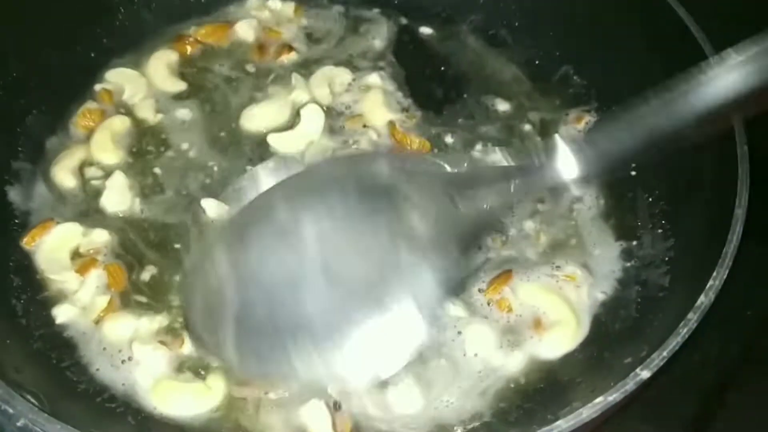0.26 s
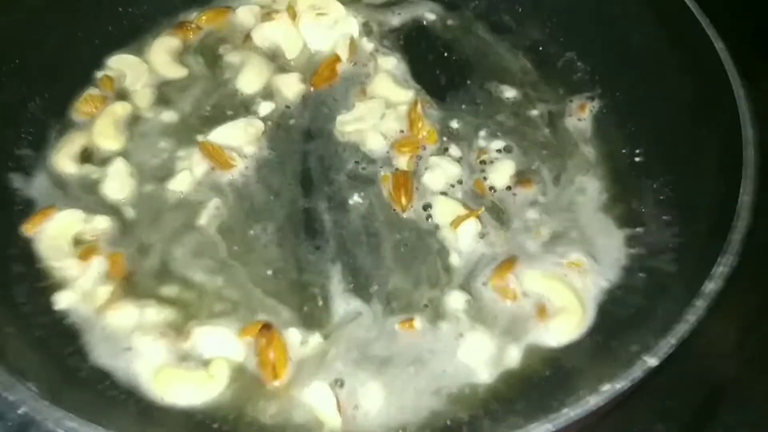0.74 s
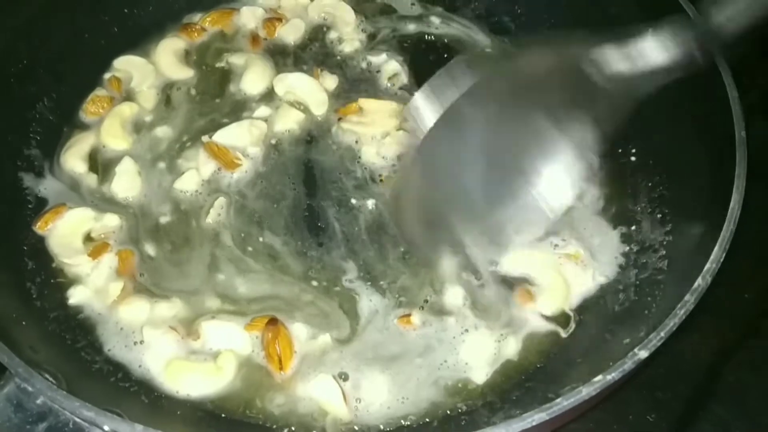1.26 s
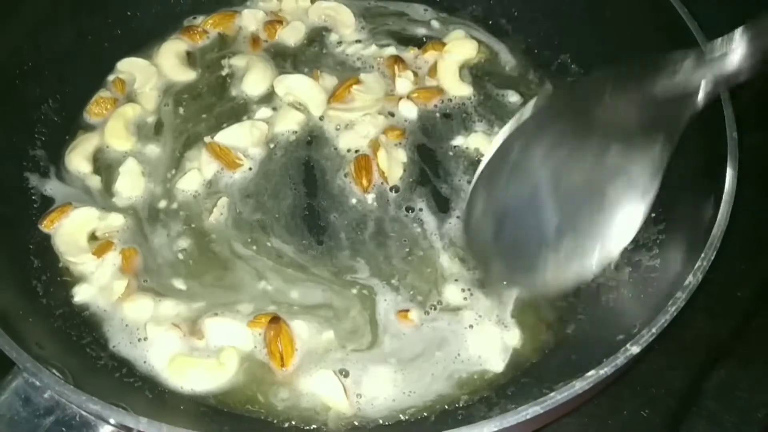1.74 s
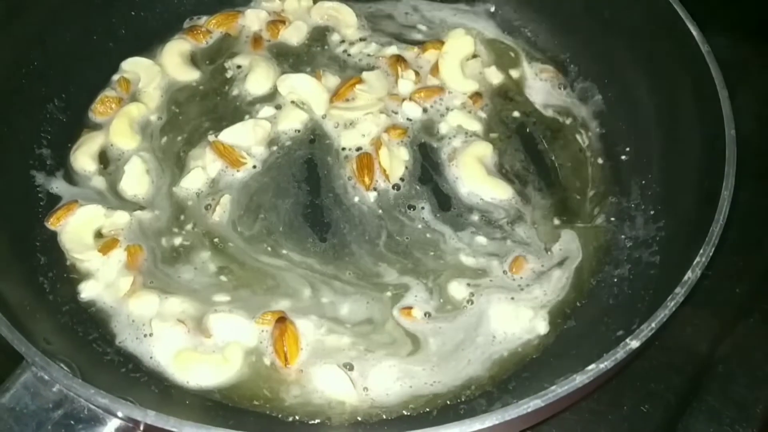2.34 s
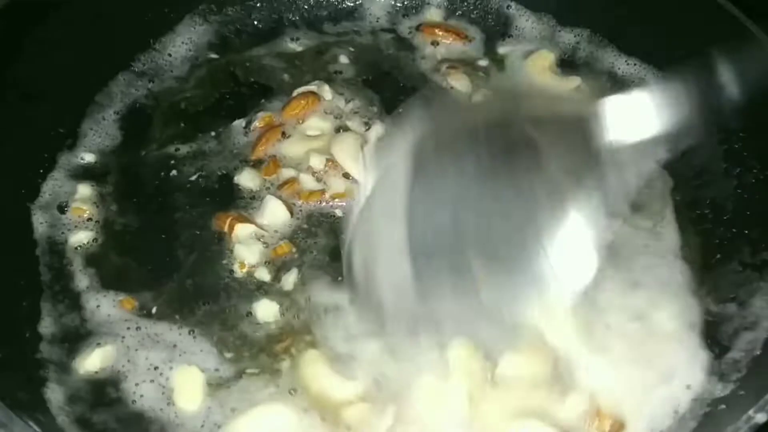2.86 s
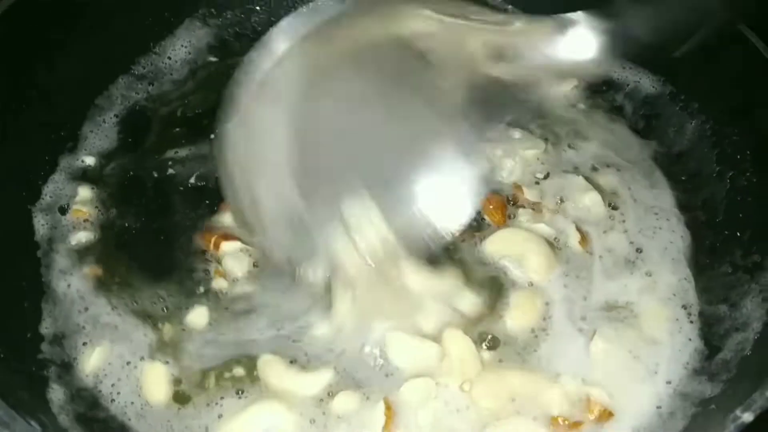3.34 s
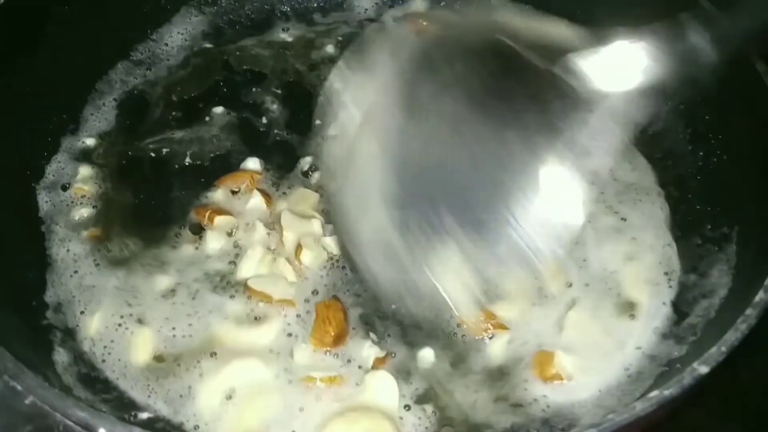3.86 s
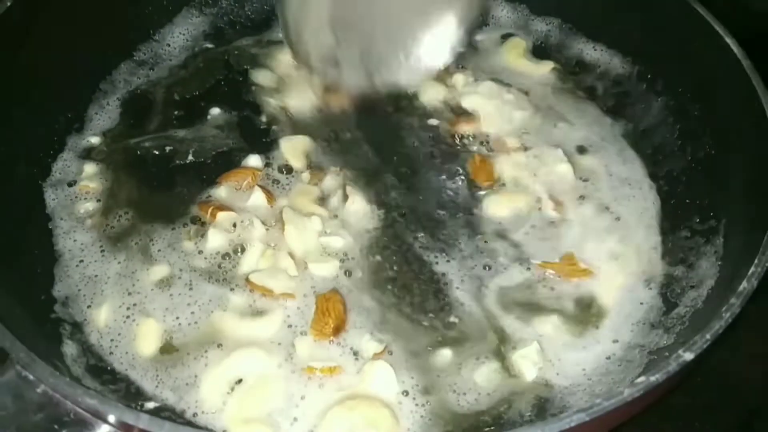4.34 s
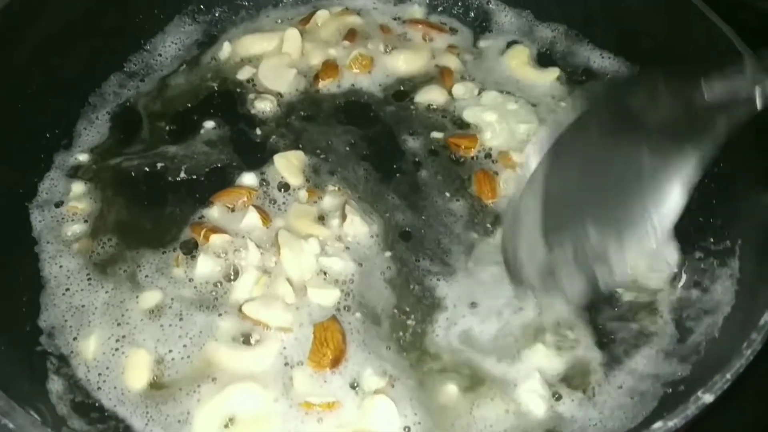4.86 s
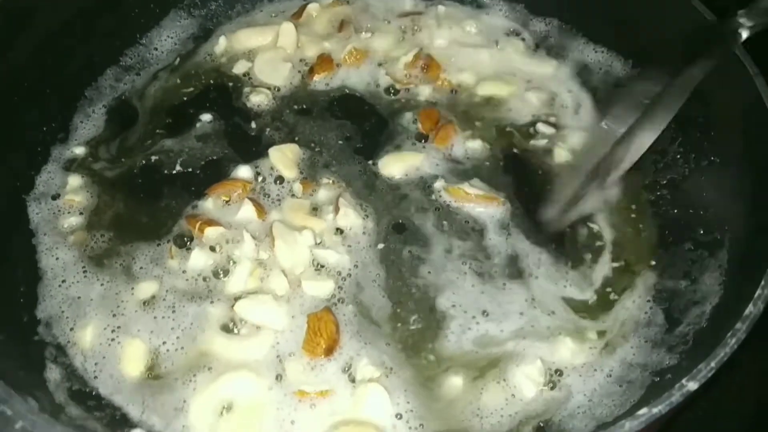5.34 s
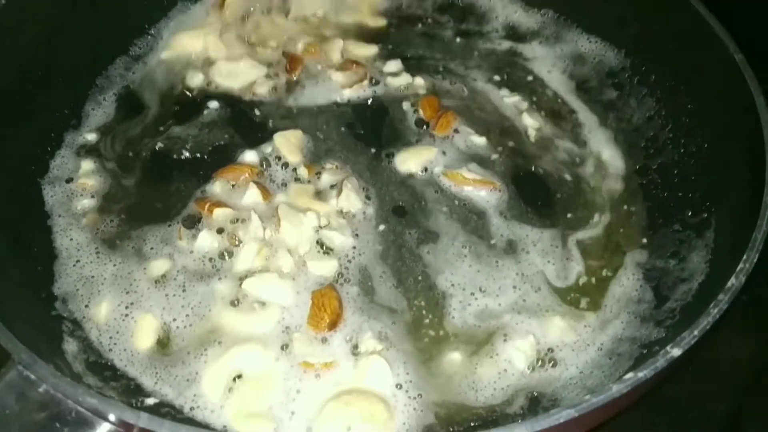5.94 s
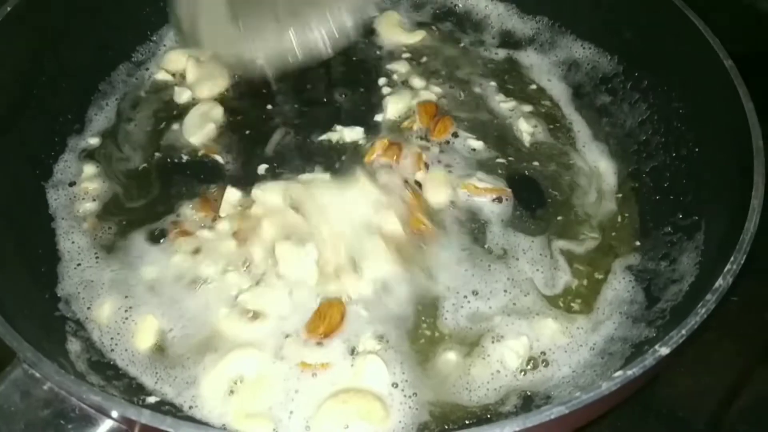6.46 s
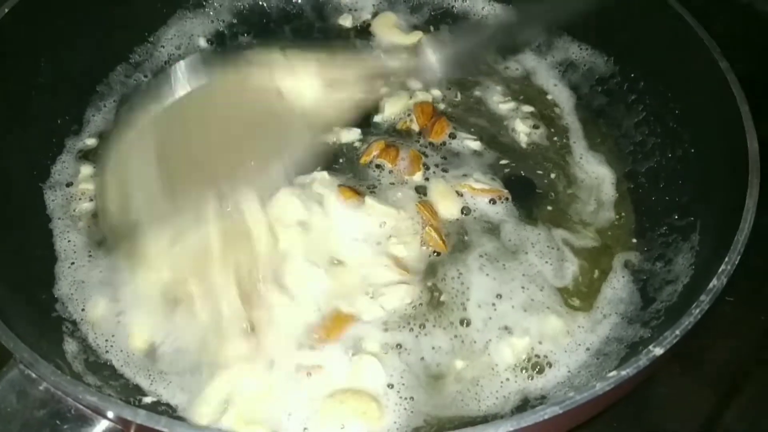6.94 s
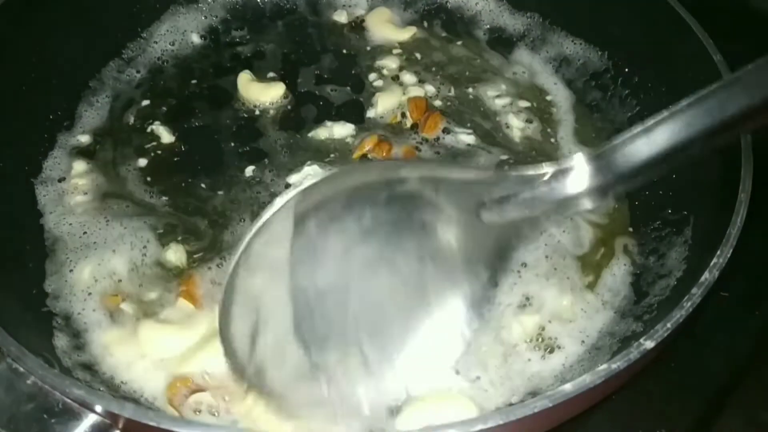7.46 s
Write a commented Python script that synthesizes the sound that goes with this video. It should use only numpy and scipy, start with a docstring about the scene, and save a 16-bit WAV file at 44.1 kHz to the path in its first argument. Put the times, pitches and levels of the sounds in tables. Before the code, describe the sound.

Close to the pan, bright dense sizzling of hot fat runs throughout, wide in stereo and finely crackling, over a faint low kitchen rumble. In the first second a spoon pushes nuts in short gritty swishes, with many tiny snapping spits, a strong one near 0.6 and another near 1.27. A hard clank at 1.3 leads into brief scrapes, bright and ringing around 1.45-1.6. Two sharp knocks follow at 1.9, then lighter taps and fizzy stirring to 2.5. The loudest, fullest knock lands at 2.8 with a quick rattle. Mostly sizzling follows until ticking knocks at 4.1-4.2 and a rising metallic scrape at 4.4-4.6. Taps at 4.8 and 5.0 come with fainter scrapes to 5.3. Pushing swells at 5.8, with a firm clack at 5.9, a double tap at 6.5, light swishes and spits after 7, and a last knock at 7.6.

```python
"""Nuts fry in hot fat in a metal pan, close under a phone with two microphones.
From the start a kitchen rumbles low (shaped noise), the fat hisses (noise with fine clicks) and a spoon
pushes the nuts about (foam fizz and friction). Soon bubbles spit (decaying tone bursts with a wash) and
the steel spoon knocks the pan (decaying modes, a tick and a rattle). Later its edge also scrapes along
the pan (stick-slip clicks through resonances), while the frying goes on."""
import sys
import numpy as np
from scipy import signal
from scipy.fft import rfft, irfft, next_fast_len
from scipy.io import wavfile
from scipy.ndimage import uniform_filter1d

SR = 44100
rng = np.random.default_rng(int(sys.argv[2]) if len(sys.argv) > 2 else 0)


def inscribe(sig):
    """Save sig as 16-bit PCM at rate SR to the path in sys.argv[1].

    A 1-D sig is mono; a 2-D sig holds one channel per row.
    Samples are clipped to [-1, 1] before scaling.
    """
    pcm = np.round(np.clip(np.atleast_2d(sig).T, -1, 1) * 32767)
    wavfile.write(sys.argv[1], SR, pcm.astype(np.int16))


N = 339339

# resonances of the pan: f/Hz, relative level/dB, free decay t60/s
PAN_MODES = [(343.4, -5.5, 0.091), (499, -10.5, 0.21), (602.5, -11.5, 0.081), (676.2, -4.5, 0.17),
             (811, -15, 0.067), (1015, -0.5, 0.037), (1251, -2.5, 0.076), (1448.4, 2, 0.067),
             (1723, -10, 0.04), (2020, 0.5, 0.029), (2257, 5, 0.024), (2624, 6.5, 0.028), (3009, 8.5, 0.02),
             (3900, -19.5, 0.071)]
# resonances of the spoon: f/Hz, width/Hz, then level/dB for a width of 50 Hz,
# touching by its side and touching by its tip
SPOON_MODES = [(4745, 30, -6, -22), (5012, 44, -9, -18), (5935, 110, -16, -9), (6410, 80, -11, -9),
               (7155, 26, -1, 0), (8085, 55, -15, -22), (9060, 36, -13, -6), (9558, 28, -6, -16),
               (10150, 140, -16, -15), (11050, 70, -18, -11), (12198, 50, -21, -9), (12962, 40, -12, -16)]


def undb(db):
    """Amplitude ratio of a level in dB."""
    return 10 ** (np.asarray(db) / 20)


def unit(x):
    """Normalise each channel to rms 1."""
    return x / np.sqrt(np.mean(x ** 2, axis=-1, keepdims=True))


def colour(x, points):
    """Spectral shaping by (Hz, dB) points, cut by 120 dB beyond the ends; rms 1."""
    hz, db = np.transpose(points)
    size = next_fast_len(x.shape[-1])
    f = np.arange(size // 2 + 1) * SR / size + 1e-3
    gain = undb(np.interp(np.log(f), np.log(hz), db, left=-120, right=-120))
    return unit(irfft(rfft(x, size) * gain, size)[..., :x.shape[-1]])


def band(x, lo_hz, hi_hz, order=2):
    """Band-pass filter: a resonance or a limited range of pitch."""
    edges = [lo_hz, min(hi_hz, .45 * SR)]
    return signal.sosfilt(signal.butter(order, edges, "bandpass", fs=SR, output="sos"), x)


def walk(rate):
    """Random modulation: levels held 1 / rate s and slewed, once a millisecond; rms 1."""
    held = np.repeat(rng.standard_normal(int(N / SR * rate) + 2), 8)
    slewed = uniform_filter1d(held, size=9)
    return unit(np.interp(np.arange(0, N / SR, .001) * rate * 8, np.arange(len(held)), slewed))


def gain_of(db):
    """Amplitude envelope for every sample from a level given once a millisecond."""
    return np.interp(np.arange(N) / SR, np.arange(len(db)) / 1000, undb(db))


def stroke_db(start, length, first_db, last_db, rise, fall):
    """Envelope of a stroke, once a millisecond: it swells, runs from first to last level and dies away."""
    t = np.arange(0, N / SR, .001) - start
    run = np.interp(t, [0, length], [first_db, last_db])
    return run + rise * np.minimum(t, 0) - fall * np.maximum(t - length, 0)  # slopes in dB/s


def crackle(rate, spread_db):
    """Shot noise: random clicks, rate a second on average, of uneven size; rms 1."""
    clicks = (rng.random(N) < rate / SR) * rng.standard_normal(N)
    return unit(clicks * undb(spread_db * rng.standard_normal(N)))


def pair(alike, one):
    """Partial coherence of two channels: one shared draw and one private to each side."""
    alike = np.clip(alike, 0, 1)
    return np.sqrt(alike) * one() + np.sqrt(1 - alike) * np.array([one(), one()])


def add(out, s, direct, tail, pan_db, lag):
    """Level and arrival-time differences place a direct sound and its tail; lag delays the left, in samples."""
    i = int(s * SR)
    n = min(len(direct), N - i - lag)
    out[0, i + lag:i + lag + n] += undb(pan_db / 2) * (direct + tail[0])[:n]
    out[1, i:i + n] += undb(-pan_db / 2) * (direct + tail[1])[:n]


def kitchen():
    """Broadband rumble that wavers; coherence between the microphones is greatest at low frequency."""
    # room rumble: f/Hz, relative level/dB per Hz
    rumble = [(12, -50.5), (20, 3), (42, 2.5), (65, -12.5), (93, -7), (168, -23.5), (220, -12), (263, -21),
              (341, -17.5), (520, -34), (680, -51), (1140, -120)]
    level_db, murmur_db = -48, 2.5  # murmur: how much the upper rumble wavers
    deep = colour(rng.standard_normal(N), rumble)
    tilted = [(hz, db + 4 * np.log2(hz / 300)) for hz, db in rumble]
    apart = colour(rng.standard_normal(N), tilted)
    both = deep + .2 * apart * np.array([[1], [-1]])
    # filtering forward and backward cancels the phase shift
    upper = band(band(both, 190, 800)[:, ::-1], 190, 800)[:, ::-1]
    both = both + upper * (gain_of(murmur_db * (walk(7) - .5)) - 1)
    return both * gain_of(level_db + .6 * walk(2.96))


def rubbed_pan():
    """Friction excitation: small slips under spoon and nuts ring the pan's modes, now one, now another."""
    slips = pair(0.24, lambda: crackle(2500, 6.9))
    out = .7 * unit(band(slips, 1300, 4200))
    for hz, db, t60 in PAN_MODES:
        width = 4.5 / t60  # contact damps the pan more than a free blow does
        ring = unit(band(slips, hz - width / 2, hz + width / 2))
        out = out + gain_of(0.53 * db + 4.83 * walk(28)) * ring
    return out / np.sqrt(uniform_filter1d(np.mean(out ** 2, axis=0), SR // 12))  # steady power


def patches(x):
    """Independent modulation of overlapping bands: neighbouring parts of a sound swell and fade apart."""
    spacing_octaves, flicker_db = 0.436, 2.17
    size = next_fast_len(N)
    hz = (np.arange(size // 2 + 1) + 1) * SR / size
    place, whole = np.log2(hz / 2000) / spacing_octaves, rfft(x, size)
    out = 0
    for k in range(8):
        patch = irfft(whole * np.clip(1 - np.abs(place - k), 0, 1), size)[:, :N]
        out = out + patch * gain_of(flicker_db * (walk(25) + .5 * walk(3.7)))
    return out


def fat(rub):
    """Superposed tiny steam-bubble bursts make hiss; stirring adds foam fizz and the friction of sliding nuts."""
    # bubble hiss: f/Hz, relative level/dB per Hz
    hiss_shape = [(2100, -49), (2600, -8.5), (3800, -10), (4600, -8.5), (6100, -1.5), (10400, -2.5),
                  (13600, -8.5), (15500, -33.5)]
    # foam fizz: f/Hz, relative level/dB per Hz
    fizz_shape = [(1300, -13.5), (1800, -12.5), (2700, -4.5), (3600, -12.5), (5500, -7.5)]
    # how hard the fat fries: t/s, hiss level/dB before its random wavering
    frying = [(0, -45.5), (2.3, -46), (3.699, -47.5), (5.2, -46), (6.3, -47.5), (7.69, -47.5)]
    # spoon pushing fat and nuts: start t/s, length/s, sliding level/dB, fizz level/dB, before wavering
    pushes = [(0.0, 0.075, -53.5, -52), (0.178, 0.046, -55, -53), (0.408, 0.014, -56.5, -65),
              (0.519, 0.089, -48.5, -53.5), (0.883, 0.13, -49, -48.5), (1.243, 0.18, -50.5, -61),
              (1.636, 0.14, -54, -53.5), (2.06, 0.1, -61.5, -63), (2.295, 0.04, -51, -47),
              (2.37, 0.065, -56, -44), (2.476, 0.066, -54, -54), (2.902, 0.12, -60.5, -53.5),
              (3.216, 0.012, -62, -51.5), (3.322, 0.017, -67, -49), (3.814, 0.12, -58, -54),
              (4.646, 0.067, -86, -58), (5.307, 0.1, -58.5, -52), (5.463, 0.06, -93, -56),
              (5.67, 0.0082, -63.5, -60), (5.792, 0.22, -52.5, -50.5), (6.584, 0.016, -49.5, -46.5),
              (7.106, 0.1, -56.5, -51), (7.329, 0.011, -60, -60), (7.597, 0.12, -53.5, -53)]
    rise, slide_fall, fizz_fall = 315.5, 308, 199  # dB/s
    slide_db = np.max([stroke_db(s, n, db, db, rise, slide_fall) for s, n, db, _ in pushes], axis=0)
    fizz_db = np.max([stroke_db(s, n, db, db, rise, fizz_fall) for s, n, _, db in pushes], axis=0)

    bubbles = lambda: rng.standard_normal(N) + 0.35 * crackle(600, 5.0)
    hiss_db = np.interp(np.arange(0, N / SR, 1 / 1000), *np.transpose(frying))
    hiss = colour(pair(0.06, bubbles), hiss_shape) * gain_of(hiss_db + 1.5 * walk(11))

    foam = lambda: rng.standard_normal(N) + 0.56 * crackle(700, 1.4)
    fizz = colour(pair(0.11, foam), fizz_shape) * gain_of(fizz_db + 4.2 * walk(45))
    slide = band(rub, 314, 2000, order=3) * gain_of(slide_db + 5.3 * walk(30))
    return patches(hiss) + fizz + slide


def spits():
    """Damped oscillation: a bubble bursts in a few cycles; spray and kitchen walls answer with a short wash."""
    # larger spitting bubbles: t/s, burst peak level/dB before panning, f/Hz, left minus right level/dB,
    # wash level/dB relative to the burst peak, before the wash swells and decays
    large = [(0.1097, -29.5, 6360, 4, -6), (0.1402, -26.5, 4180, 3, -11), (0.175, -27.5, 8600, -3, -17),
             (0.2027, -26, 8200, -2, -10), (0.2216, -22.5, 7000, -1, -11), (0.3462, -21, 8200, -3, -14),
             (0.4005, -28, 11900, 6, -19), (0.4518, -30.5, 6630, 7, -13.5), (0.512, -25.5, 8450, -3, -15),
             (0.529, -26, 8400, 0, -10), (0.5802, -22, 7140, 6, -13), (0.5957, -15, 9130, -1, -13),
             (0.7934, -22, 6250, 5.5, -14.5), (1.0331, -20.5, 10900, 2.0, -17),
             (1.1463, -29.5, 10500, 0, -7), (1.268, -13.5, 4470, 1.5, -17), (1.6625, -23, 6800, 5, -11),
             (1.692, -31.5, 6150, 11, -11), (1.731, -20, 6000, 0, -19.5), (1.746, -26, 5600, 2, -13),
             (1.7694, -21.5, 5840, -1, -11.5), (1.7898, -25, 5000, 9, -20), (2.1246, -25.5, 7800, 4, -12),
             (2.2958, -20.5, 6400, 0, -11.5), (2.3055, -25, 5500, 3, -9), (2.3481, -24.5, 8600, 0, -8),
             (2.505, -31, 6100, 12, -18), (2.563, -28, 5960, 6, -12), (2.9345, -20.5, 5150, 2, -11.5),
             (3.038, -22, 7760, 0, -12.5), (3.4144, -26.5, 9500, -6, -15), (4.261, -22.5, 6130, -4, -10),
             (4.6677, -26, 11190, -2, -11), (4.8317, -18.5, 5170, 5.5, -16), (5.171, -27, 6100, -6, -7),
             (5.3033, -27.5, 6400, -1, -9), (5.3173, -25, 7530, -1, -15), (5.6655, -36, 7800, 10, -5),
             (7.1317, -29.5, 6230, 8, -11.5), (7.229, -26, 9300, -1, -7.5), (7.337, -25, 9360, -2, -13)]
    small_db, small_spread_db, small_wash_db = -42.5, 2.5, -13
    decay_cycles, wash_t60_s = 4.4, 0.12  # the burst's tone falls to 1/e in so many cycles
    out, t = np.zeros((2, N)), np.arange(SR // 8) / SR
    where, size = rng.random(size=(90, 2)), rng.standard_normal(size=(90, 2))
    small = [(a * (N / SR - .2), small_db + small_spread_db * c, 4500 + 6000 * b, 1.5 + 4 * d, small_wash_db)
             for (a, b), (c, d) in zip(where, size)]
    for s, db, hz, pan_db, wash_db in list(large) + small:
        noise = rng.standard_normal((3, len(t)))
        burst = np.sin(2 * np.pi * hz * t) * np.exp(-t * hz / decay_cycles)
        burst = burst + .4 * noise[0] * np.exp(-t / .001)
        burst = band(burst * (1 - np.exp(-t / 0.0003)), hz / 2.55, hz * 2.1, order=3)
        wash = unit(band(noise[1:], hz / 1.41, hz * 1.37)) * undb(wash_db)
        wash = wash * np.exp(-t * np.log(1000) / wash_t60_s) * (1 - np.exp(-t / 0.0011))
        add(out, s, undb(db) * burst / np.abs(burst).max(), undb(db) * wash, pan_db, lag=1)
    return out


def knocks():
    """Impact excitation: each blow mixes the pan's modes anew; the spoon ticks and rings, a rattle trails."""
    # spoon knocks: t/s, blow peak level/dB, low, middle and high level/dB (the balance within the blow
    # and, with fixed offsets, the rattle), thud f/Hz
    blows = [(0.411, -24, -46, -27, -29, 536), (1.329, -10, -15.5, -13, -16, 610),
             (1.878, -11, -24.5, -17, -12.5, 1060), (1.953, -11, -72, -62, -22.5, 1390),
             (2.181, -26, -47, -26.5, -29.5, 960), (2.294, -28, -32.5, -25.5, -38, 1430),
             (2.385, -23, -40, -31, -36, 1150), (2.829, -4.5, -10, -12.5, -20, 1250),
             (2.902, -15, -37, -16, -15, 1410), (2.909, -16, -45, -34, -18.5, 655),
             (4.124, -16, -55, -40, -19.5, 1500), (4.222, -19, -37.5, -24.5, -18.5, 1510),
             (4.37, -32.5, -29, -40, -44, 485), (4.829, -19.5, -40.5, -23.5, -29, 1330),
             (5, -19, -20.5, -30.5, -30.5, 714), (5.774, -27, -25.5, -41, -37, 556),
             (5.858, -23, -22.5, -48, -25.5, 550), (5.9052, -10, -25, -17, -23.5, 1200),
             (6.534, -20, -29.5, -24.5, -41, 810), (6.542, -20, -52, -18, -18, 678),
             (7.587, -19, -28.5, -38, -26, 1020)]
    landing_gap = 130  # samples between the small landings in a rattle
    out, t = np.zeros((2, N)), np.arange(SR // 5) / SR
    hz, mode_db, t60 = (c[:, None] for c in np.transpose(PAN_MODES))
    low = hz[:, 0] < 1600
    peak = lambda x: x / np.abs(x).max()
    fade = lambda t60_s: np.exp(-t * np.log(1000) / t60_s)
    spoon = lambda x: sum(undb(d) * band(x, f - w, f + w, order=1) for f, w, d, _ in SPOON_MODES[:8])
    pan = lambda x: sum(band(x, f - 3.5 / ring_s, f + 5.4 / ring_s, order=1) for f, _, ring_s in PAN_MODES)
    onset = 1 - np.exp(-(t / .002) ** 6)  # the blow sets in steeply after about 2 ms
    for s, db, low_db, mid_db, high_db, thud_hz in blows:
        chance, noise = rng.standard_normal((3, len(PAN_MODES), 1)), rng.standard_normal((3, len(t)))
        # nuts jump and land unevenly
        landings = np.repeat(rng.standard_normal(len(t) // landing_gap + 1), landing_gap)[:len(t)]
        noise[1:] *= undb(2.1 * landings)

        phase = 2 * np.pi * hz * (1 + 0.019 * chance[1]) * t + 1.17 * chance[2]
        modes = undb(mode_db + 0.71 * chance[0]) * np.sin(phase) * fade(t60)
        modes = modes * onset * (1 + 9 * np.exp(-t / .0017))  # the fat damps the first swings fast
        # the spot struck favours the modes near one pitch
        modes[low] *= undb(-13 * np.abs(np.log2(hz[low] / thud_hz)))
        tick = band(noise[0], 3800, 13500) * onset * np.exp(-t / .0012)
        blow = undb(low_db) * peak(modes[low].sum(0)) + undb(mid_db) * peak(modes[~low].sum(0))
        blow = blow + undb(high_db - 2.5) * peak(tick)

        low_rattle = unit(band(pan(noise[0] + 0.68 * noise[1:]), thud_hz / 2.7, thud_hz * 1.62))
        mid_rattle = unit(band(pan(noise[1:]) + .3 * noise[1:], 1890, 3695))
        high_rattle = unit(unit(band(noise[1:], 3800, 11000)) + 0.24 * unit(spoon(noise[1:])))
        rattle = (undb(low_db - 9.5) * low_rattle * fade(0.19)
                  + undb(mid_db - 12.5) * mid_rattle * fade(0.16)
                  + undb(high_db - 7.5) * high_rattle * fade(0.15))
        rattle = rattle * onset * (1 - np.exp(-t / 0.0039))
        add(out, s, undb(db) * peak(blow), rattle, pan_db=0, lag=4)
    return out


def scrapes(grind):
    """Stick-slip: dense clicks ring the spoon's modes, each fluttering on its own, and grind the pan."""
    # spoon edge dragged over the pan: start t/s, length/s, level/dB at start and at end,
    # grind level/dB relative to the ring, favoured grind f/Hz, left minus right level/dB of the upper
    # middle, contact (0 side to 1 tip), singing spoon mode f/Hz
    drags = [(1.337, 0.084, -33.5, -40, -3.5, 483, 2, .1, 7160),
             (1.449, 0.042, -23, -27, -19, 1000, 5.2, 0.05, 7160),
             (1.505, 0.098, -24, -20.5, -10.5, 2240, 2.9, 0.039, 5010),
             (4.426, 0.17, -33, -23.5, -7, 1028, 5, 1, 9050),
             (5.019, 0.067, -42, -45, -2.5, 673, 1.3, 0.54, 5010),
             (5.182, 0.089, -39.5, -48.5, 5, 890, 0.78, 1, 7160)]
    rise, fall = 423, 595  # dB/s
    sing_db = 6  # how far the singing mode stands over its usual level
    grind_rest_db, grit_db = 2, 0  # the pan's other modes and a toneless rasp, against the favoured pitch
    slips = pair(0.079, lambda: crackle(4000, 2.3))
    rasp_bed, modes = 0.45 * unit(band(slips, 2330, 11800)), []
    for hz, width, *_ in SPOON_MODES:
        # the contact keeps changing, so every mode flutters and smears
        flutter = gain_of(2.2 * walk(25) + 2.1 * walk(70))
        modes.append(flutter * unit(band(slips, hz - width / 2, hz + width / 2, order=1)))
    mode_hz, width, side_db, tip_db = np.transpose(SPOON_MODES)
    out, judder = np.zeros((2, N)), gain_of(0.99 * walk(90))  # the edge catches and lets go
    for s, length, first_db, last_db, grind_db, pitch_hz, pan_db, tip, sing_hz in drags:
        near = slice(int((s - .25) * SR), int((s + length + .25) * SR))
        gain = gain_of(stroke_db(s, length, first_db, last_db, rise, fall))[near]
        side = undb(np.array([[pan_db], [-pan_db]]) / 2)
        side = side / side.mean()

        db = side_db + np.clip(tip, 0, 1) * (tip_db - side_db) + 10 * np.log10(width / 50)
        db[np.argmin(np.abs(mode_hz - sing_hz))] += sing_db
        ring = rasp_bed[:, near] + sum(undb(d) * mode[:, near] for d, mode in zip(db, modes))
        # the modes share one supply of friction energy
        ring = ring / np.sqrt(uniform_filter1d(np.mean(ring ** 2, axis=0), SR // 20))

        favoured = unit(band(slips[:, near], pitch_hz / 1.06, pitch_hz * 1.06))
        grit = undb(grit_db) * unit(band(slips[:, near], 1360, 4430))
        pan = undb(grind_rest_db) * unit(grind[:, near]) + favoured + grit
        rasp = gain * judder[near] * (ring + undb(grind_db) * unit(pan))
        # the bowl of the spoon beams the upper middle of its sound to one side
        middle = band(band(rasp, 2900, 12700)[:, ::-1], 4000, 8300)[:, ::-1]
        out[:, near] += rasp + (side - 1) * middle
    return out


def scene():
    """Linear superposition of all sources; one rubbed pan serves both pushing and scraping."""
    rub = rubbed_pan()
    return fat(rub) + spits() + knocks() + scrapes(rub) + kitchen()


def record(dry):
    """Linear filtering: the two microphone ports favour different pitches; the phone cuts the top."""
    # microphone ports: f/Hz, left minus right level/dB
    ports = [(100, -1.5), (700, -2), (1300, -2), (2400, 2.5), (4400, 4.5), (8000, 2.3), (15000, -0.8)]
    top_hz = 15500
    size, (hz, db) = next_fast_len(N), np.transpose(ports)
    lean = np.interp(np.log((np.arange(size // 2 + 1) + 1) * SR / size), np.log(hz), db) / 2
    heard = irfft(rfft(dry, size) * undb([lean, -lean]), size)[:, :N]
    return signal.sosfilt(signal.ellip(8, .2, 70, top_hz, fs=SR, output="sos"), heard)


dry = scene()
out = record(dry)
inscribe(out)
```